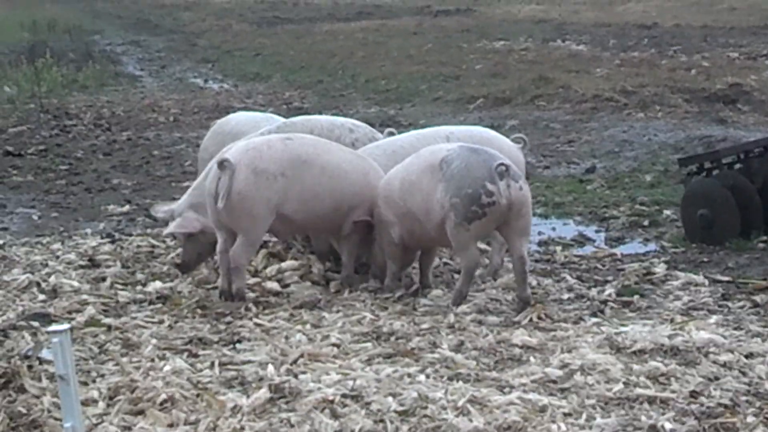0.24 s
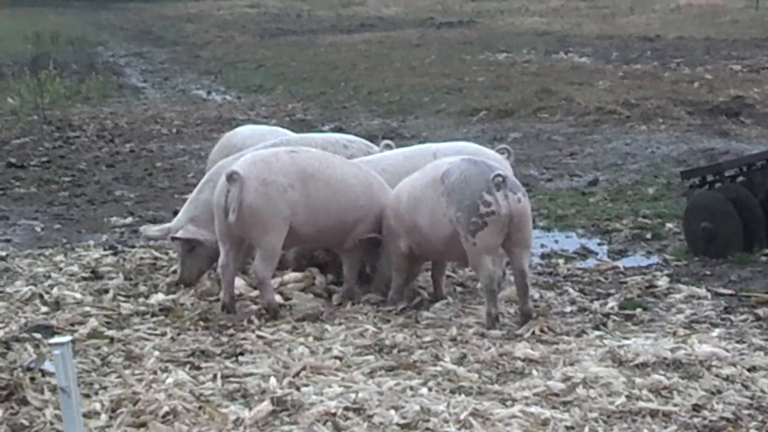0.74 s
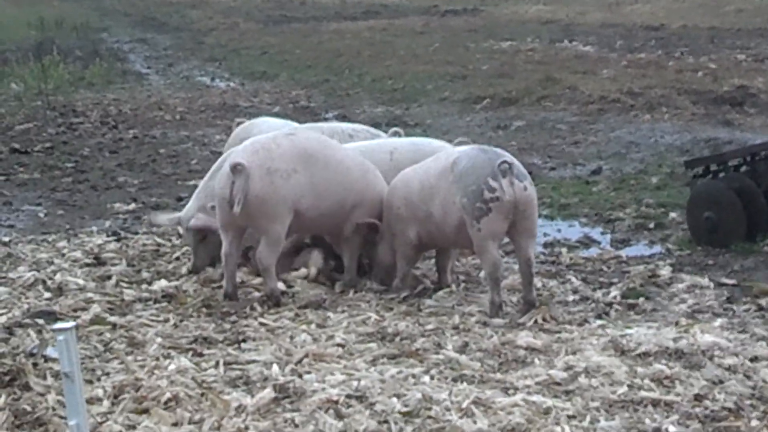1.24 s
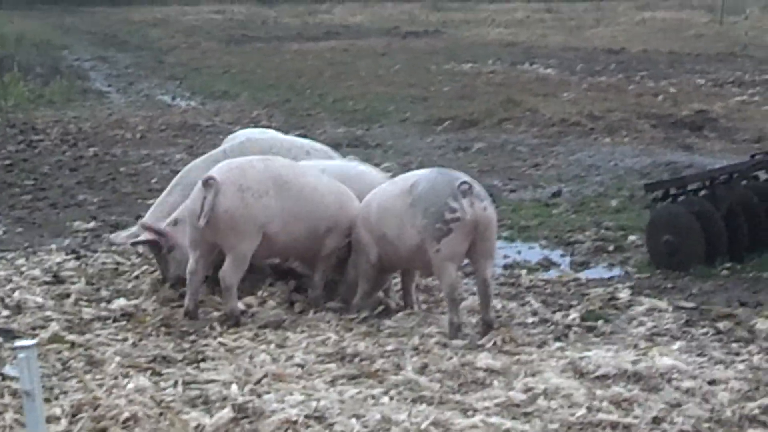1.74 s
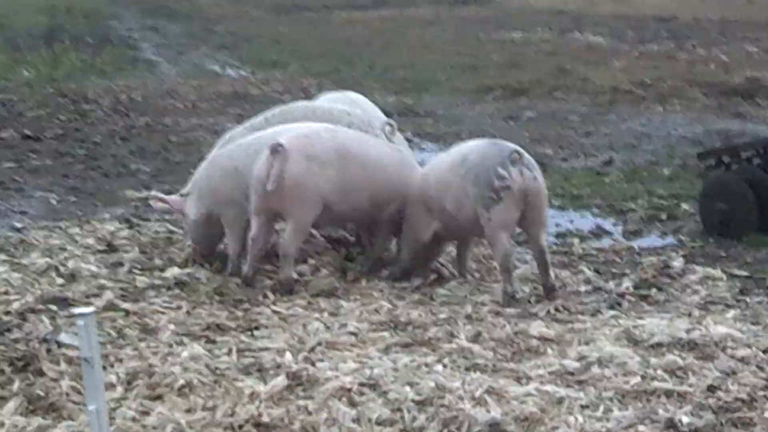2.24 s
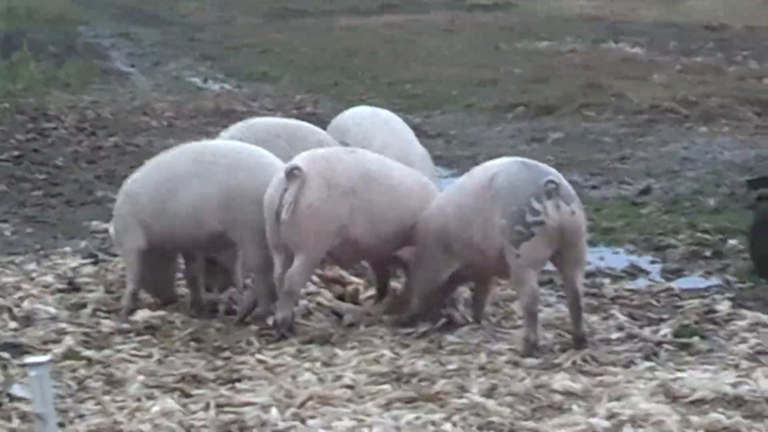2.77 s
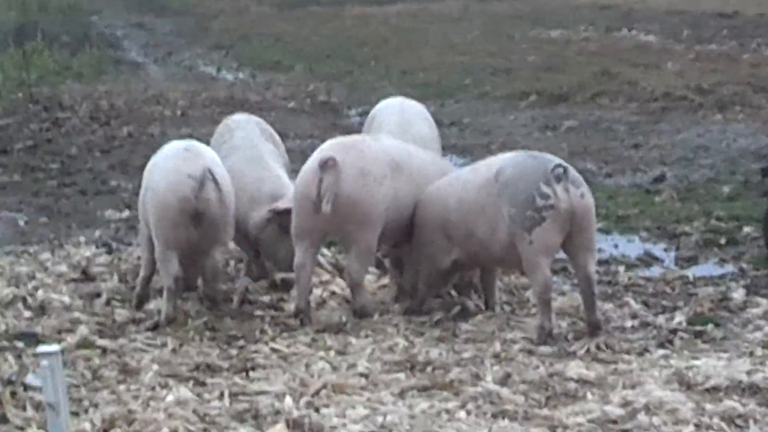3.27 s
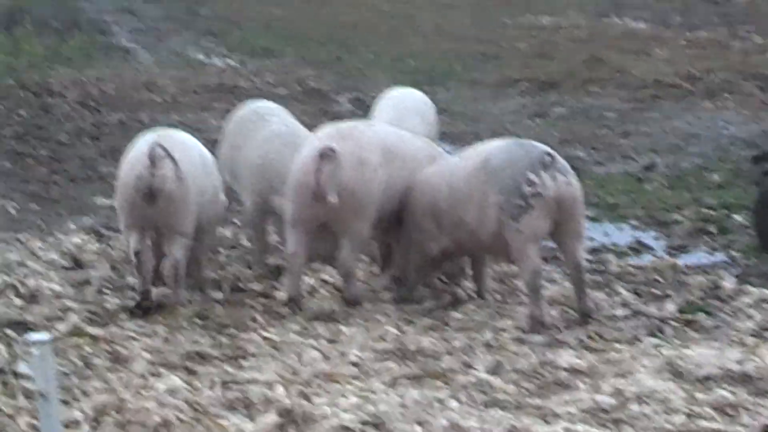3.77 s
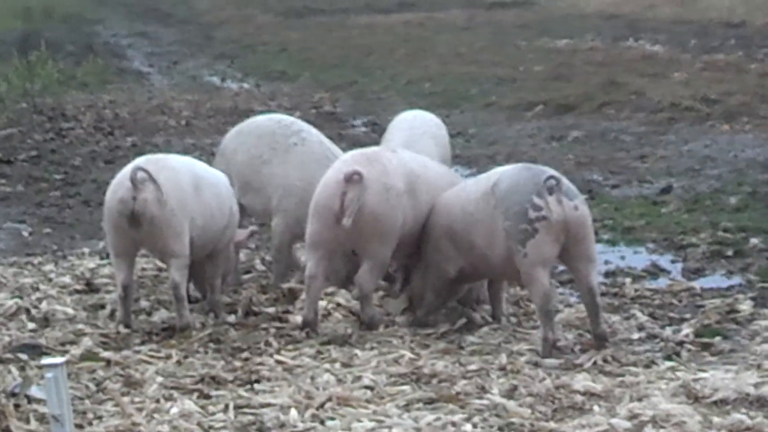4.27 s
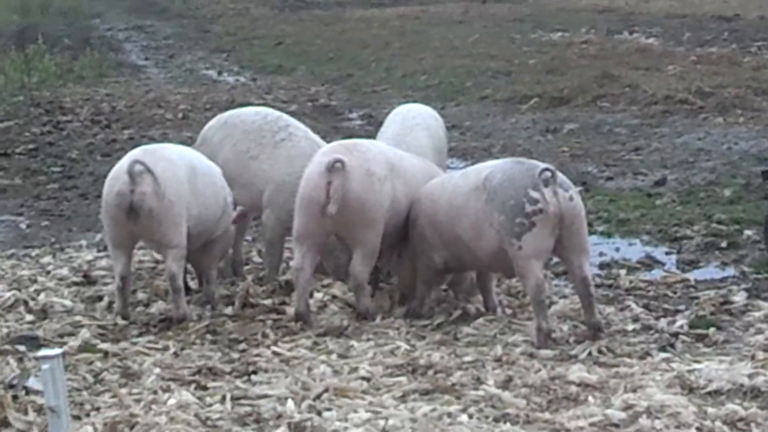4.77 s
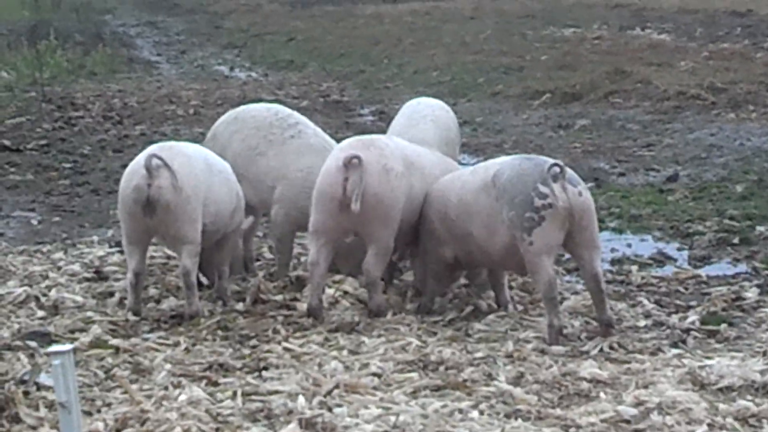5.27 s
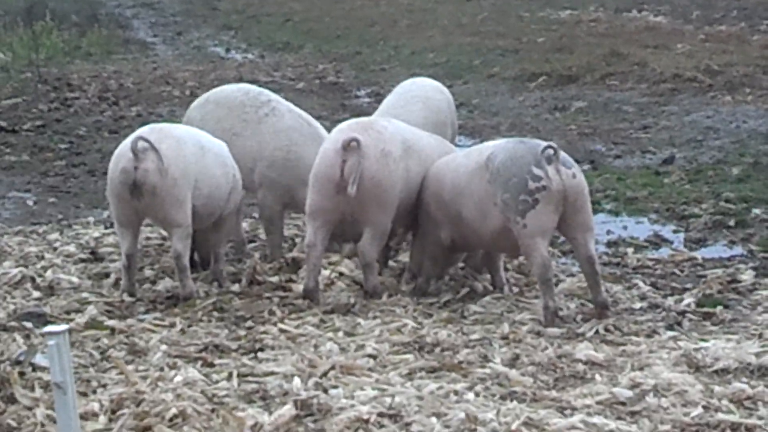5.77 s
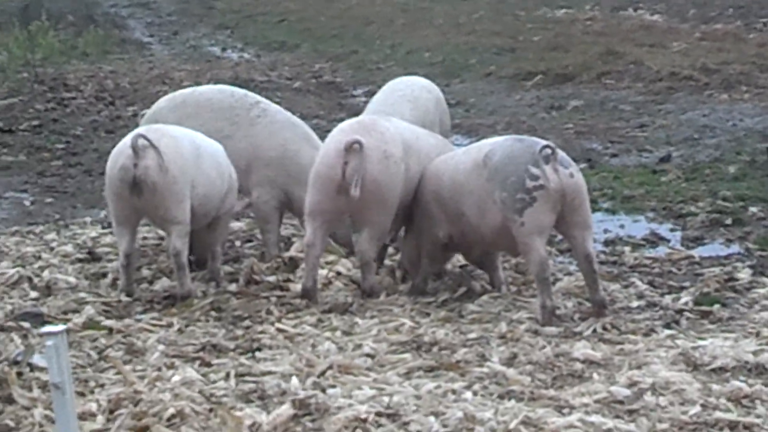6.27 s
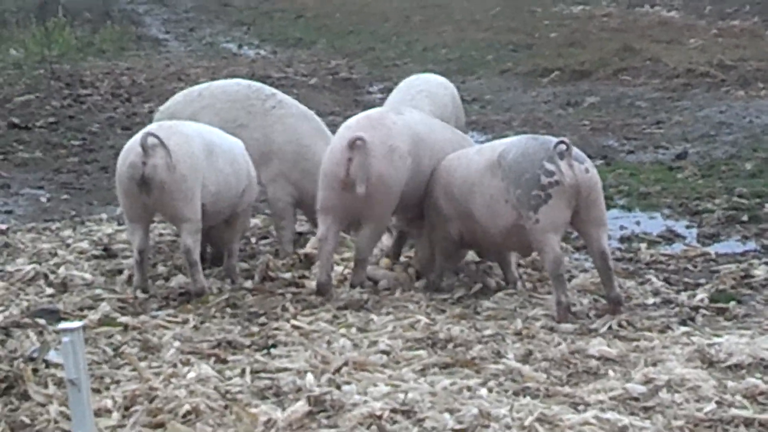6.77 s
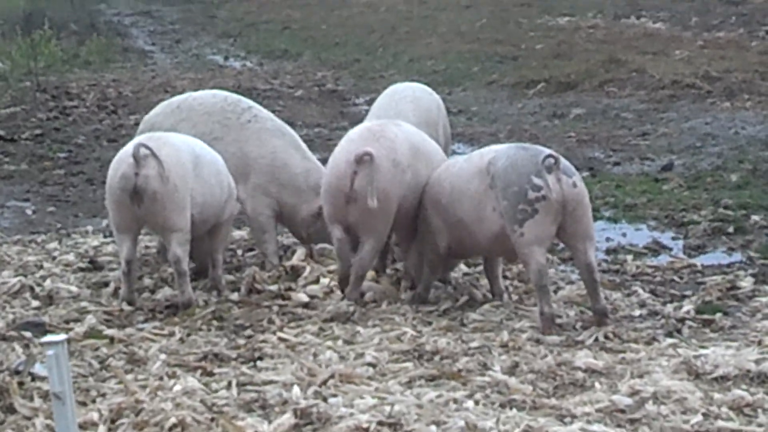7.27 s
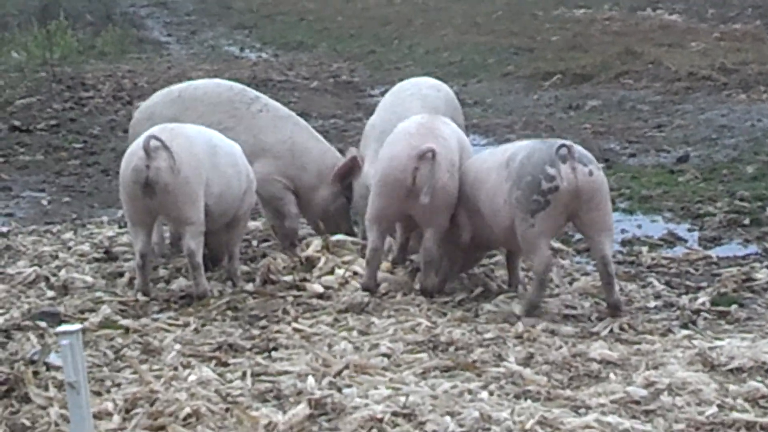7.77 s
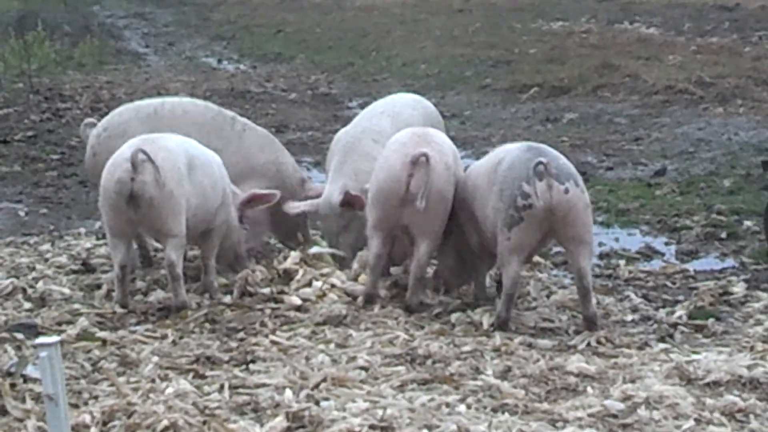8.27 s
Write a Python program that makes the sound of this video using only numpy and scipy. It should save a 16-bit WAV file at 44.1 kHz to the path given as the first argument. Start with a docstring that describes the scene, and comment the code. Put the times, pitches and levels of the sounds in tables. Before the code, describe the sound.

Steady rushing air with lumpy low rumble and thin hiss fills an open field. Dry husks rustle at once, with tiny clicks at the start and soft knocks at 0.3 and 0.6 s. A hard, hollow crunch breaks out at 1.05-1.15 s, another knock at 1.5. Piercing brittle snaps at 2.15-2.25 s push everything down; the rush then slowly swells back. Hollow, slightly ringing knocks come at 3.05-3.3 and 4.6 s, with small ticks between. Rustling thickens around 5.5-6.2 s, with a dull knock at 6.1. Low thuds and crunches cluster at 6.8-7.2, then a hard knock at 7.46 and a deep thump at 7.8. A distant bird's thin falling whistles recur from 1.6 to 4 s, clearest near 5.6, then at 6.4 and faintly around 8. Husks stir to the end at 8.5 s. The stereo is wide and out of phase.

```python
"""Pigs root in dry corn stalks in an open field: hollow knocks (resonant modes struck by bursts of force)
and sharp snaps (very short bursts through bright resonances). Snouts shove through husks (shaped noise and
crackle) over a steady rush of air (shaped noise); a far bird whistles (falling sines with echoes).
The gain control ducks at each loud blow and creeps back, so everything sinks and swells again.
The small stereo microphone hears mostly through one port, so the sound is wide and out of phase."""
import sys
import numpy as np
from scipy import signal
from scipy.fft import rfft, irfft, next_fast_len
from scipy.io import wavfile
from scipy.ndimage import uniform_filter1d

SR = 44100
rng = np.random.default_rng(int(sys.argv[2]) if len(sys.argv) > 2 else 0)


def to_wav(sig):
    """Store sig (one row per channel, or 1-D mono) as 16-bit WAV at the path in sys.argv[1].

    Samples outside -1..1 are clipped; the rate is SR.
    """
    pcm = np.clip(np.atleast_2d(sig), -1, 1) * 32767
    pcm = np.round(pcm).astype(np.int16)
    wavfile.write(sys.argv[1], SR, pcm.T)  # frames by channels


N = 375732

# spectrum of rushing air, also of dull rubbing: (frequency [Hz], relative level per Hz [dB])
AIR_SPECTRUM = [(200, -19), (500, 1.5), (900, 3.5), (1300, -1), (1800, -3), (2300, -1.5), (3000, -14.5),
                (4200, -17.5), (8000, -29)]


def from_db(db):
    """Decibels to amplitude gain."""
    return 10 ** (np.asarray(db) / 20)


def rms_one(x):
    """Scale to rms 1."""
    return x / np.sqrt(np.mean(x ** 2) + 1e-20)


def in_time(rows):
    """A level curve, interpolated to every sample."""
    s, level = np.transpose(rows)
    return np.interp(np.arange(N) / SR, s, level)


def add(out, s, sound):
    """Mix a sound in at a time in seconds."""
    at = int(np.clip(round(s * SR), 0, N - 1))
    out[at:at + len(sound)] += sound[:N - at]


def drift(rate_hz):
    """Slow random wandering of rms 1: noise smoothed by two equal poles."""
    step = 40   # samples between the slow values
    r = np.exp(-2 * np.pi * rate_hz * step / SR)
    noise = rng.standard_normal(N // step + 2002)
    slow = signal.lfilter([1], [1, -2 * r, r * r], noise)[2000:]   # skip the filter's start
    return np.interp(np.arange(N) / step, np.arange(len(slow)), rms_one(slow))


def colour(x, spectrum):
    """Give a steady sound a spectrum; rms 1."""
    hz, db = np.transpose(spectrum)
    size = next_fast_len(N)
    bins = np.maximum(np.arange(size // 2 + 1) * SR / size, 1)
    gain = from_db(np.interp(np.log(bins), np.log(hz), db))
    return rms_one(irfft(rfft(x, size) * gain, size)[:N])


def resonate(x, modes, sign=-1):
    """Parallel resonances with alternating signs, or (sign 1) all starting in step."""
    out = 0
    for k, (hz, width, db) in enumerate(modes):
        r = np.exp(-np.pi * width / SR)
        poles = [1, -2 * r * np.cos(2 * np.pi * hz / SR), r * r]
        mode = (1 - r * r) / 2 * signal.lfilter([1, 0, -1], poles, x)
        out = out + sign ** k * from_db(db) * mode
    return out


def band(x, low_hz, high_hz):
    """Butterworth band-pass."""
    return signal.sosfilt(signal.butter(2, [low_hz, high_hz], "band", fs=SR, output="sos"), x)


def at_level(x, db, first_s):
    """Set the rms level of a sound's first moments."""
    return from_db(db) * x / np.sqrt(np.mean(x[:int(first_s * SR)] ** 2) + 1e-20)


def envelope(x):
    """Running rms over a span short enough to read peaks, keener on the treble."""
    span_s, treble_weight = 0.00069, 2.72
    weighted = x + treble_weight * np.diff(x, prepend=0)
    power = uniform_filter1d(weighted ** 2, int(span_s * SR))
    return np.sqrt(np.maximum(power, 1e-12))


def at_peak(x, db):
    """Set the peak reading of a sound."""
    return from_db(db) * x / envelope(x).max()


def rush(rumble_db, air_db, hiss_db, lumpy_db, flutter_db, flicker_db):
    """Open air all around: lumpy low rumble, rushing air and a thin, flickering hiss, all shaped noise."""
    # spectra of rumble and hiss: (frequency [Hz], relative level per Hz [dB])
    rumble_spectrum = [(12, -36), (25, -10), (50, -15), (80, -5), (120, 1), (200, -5.5), (280, -7),
                       (420, -12.5), (600, -29.5), (1200, -57)]
    hiss_spectrum = [(3000, -48), (6000, 0.5), (8500, -10.5), (11500, -10.5), (13500, 2), (15500, 2.5)]
    layers = [(rumble_db + lumpy_db * drift(5.2), rumble_spectrum),
              (air_db + flutter_db * drift(22.0), AIR_SPECTRUM),
              (hiss_db + flicker_db * drift(23), hiss_spectrum)]
    return sum(from_db(db) * colour(rng.standard_normal(N), spectrum) for db, spectrum in layers)


def bird(waver_hz, echo_db, echo_s):
    """A far bird repeats a thin falling whistle, a wavering sine smeared by scattered echoes."""
    # falling whistles:
    # (time [s], length [s], start pitch [Hz], fall [Hz], peak level before flutter and echoes [dB])
    calls = [(1.57, 0.19, 3300, 90.3, -44), (1.984, .2, 3360, 110, -39.5), (2.553, .22, 3430, 260, -39),
             (3.17, .24, 3320, 125, -37), (3.88, .24, 3375, 240, -39.5), (5.563, 0.28, 3360, 150, -34.5),
             (6.42, 0.24, 3310, 80, -42), (7.724, .22, 3690, 160, -45.5), (7.848, 0.12, 3620, 70, -46.5),
             (8.038, 0.19, 3654, 150, -45.5), (8.142, .19, 3420, 220, -46)]
    out, waver = np.zeros(N), drift(132.8)
    flutter = from_db(1.8 * drift(25))   # moving air breaks up the far calls
    for s, length_s, start_hz, fall_hz, db in calls:
        u = np.linspace(0, 1, int(length_s * SR))
        hz = start_hz - fall_hz * u + waver_hz * np.roll(waver, -int(s * SR))[:len(u)]
        swell = np.interp(u, [0, .15, .55, 1], [0, 1, .7, .1])
        add(out, s, from_db(db) * swell * np.sin(2 * np.pi * np.cumsum(hz) / SR))
    out = out * flutter
    t = np.arange(SR // 2) / SR
    echoes = rng.standard_normal(len(t)) * np.exp(-t / echo_s)
    echoes = echoes / np.sqrt(np.sum(echoes ** 2))
    return out + from_db(echo_db) * signal.fftconvolve(out, echoes)[:N]


def crackle(per_s, spread_db, clump_db):
    """Tiny fibre breaks of uneven size that come in clumps; rms 1."""
    born = rng.random(N) < per_s * from_db(clump_db * drift(14)) / SR
    sizes = from_db(spread_db * np.minimum(rng.exponential(1, N), 4))
    return rms_one(born * sizes * rng.choice([-1, 1], N))


def shoving():
    """Strength of the rustle and of the rubbing: each shove swells and fades in one smooth arch."""
    # a snout or foot shoves through the husks:
    # (time at the strongest [s], length [s], rustle [dB], dull rubbing relative to the rustle [dB])
    shoves = [(0.016, .17, -30, -13), (0.218, 0.23, -39, 0), (0.823, 0.35, -36, -1),
              (1.01, 0.23, -38.5, -4), (1.844, 0.3, -36, 0.5), (2.11, 0.33, -37, -11),
              (2.916, 0.13, -36, -7.5), (4.165, 0.041, -42, 7.5), (4.457, 0.044, -40.5, 2.5),
              (4.61, .045, -39.5, -2), (5.494, 0.27, -36.5, -4.5), (5.662, .23, -32, -4),
              (5.957, 0.24, -32.5, -2), (6.105, 0.15, -36.5, 0), (6.188, 0.2, -36, -5.5),
              (7.162, 0.24, -40, 6.5), (7.982, 0.26, -41, -4), (8.478, 0.42, -38.5, -1.5)]
    t = np.arange(N) / SR
    strength = np.zeros((2, N))
    for s, length_s, db, rub_db in shoves:
        arch = np.cos(np.pi * np.clip((t - s) / length_s, -.5, .5))
        strength += from_db([[db], [db + rub_db]]) * arch
    return strength


def husks(push, rubbing, grain_share, tick_db):
    """Snouts and feet push through dry husks: smooth rubbing, fine crackle and now and then a small tick."""
    # spectrum of rustling husks: (frequency [Hz], relative level per Hz [dB])
    rustle_spectrum = [(1000, -4), (2200, 5), (3000, 4), (3450, 2.5), (3850, 2.5), (4400, 0), (5500, -8),
                       (7500, -15), (10000, -22.5), (16000, -31)]
    steady_rustle = from_db(-44.5)   # husks stirring all the time
    grains = crackle(per_s=1500, spread_db=5.5, clump_db=5.5)
    mixed = np.sqrt(grain_share) * grains + np.sqrt(1 - grain_share) * rng.standard_normal(N)
    rustle = colour(mixed, rustle_spectrum)
    t = np.arange(SR // 50) / SR
    tear = rng.standard_normal(len(t)) * np.exp(-t / 0.0062)   # a fibre tears over a few milliseconds
    breaks = crackle(per_s=30, spread_db=-6.0, clump_db=-0.5)
    ticks = rms_one(band(signal.fftconvolve(breaks, tear)[:N], 1500, 5900))
    rub = rubbing * colour(rng.standard_normal(N), AIR_SPECTRUM)
    return np.hypot(steady_rustle, push) * (rustle + from_db(tick_db) * ticks) + rub


def contact(t, rattle_s, hardness, tail_db, tail_s):
    """A hard blow is mostly one push; a soft one builds up and rattles in slips. Loose litter settles after."""
    grip = from_db(1.5 * rng.standard_normal(len(t) // 64 + 1)).repeat(64)[:len(t)]   # changes every 1.5 ms
    build = 1 - np.exp(-t / (0.14 * rattle_s * (1 - hardness) + 1 / SR))
    decay = np.exp(-t / rattle_s) + from_db(tail_db) * np.exp(-t / tail_s)
    rattle = rng.standard_normal(len(t)) * grip * build * decay
    rattle = rattle / np.sqrt(np.sum(rattle ** 2))
    push = 1.32 * hardness * (t == 0)
    return np.sqrt(1 - hardness ** 4) * rattle + push


def snaps():
    """Brittle breaks: a very short burst through broad, bright resonances; a thicker stalk sounds lower."""
    # dry snaps and chewing ticks, peaks ahead of the gain control:
    # (time [s], peak reading [dB], top relative to the crack [dB], decay [s], pitch [ratio])
    breaks = [(0.0275, -14, -14, .0005, 1), (0.0402, -17, -14, .0005, 1), (0.531, -21, -7.5, 0.0056, 0.28),
              (0.757, -27, -4, 0.00091, 1), (1.016, -19, 3, 0.00024, 2.1), (1.107, -17, -18, .0015, .9),
              (1.147, -15.5, -15, 0.0038, 1.16), (1.354, -23, -18, .001, .6),
              (2.159, -3.5, 3, 0.00018, 0.84), (2.2184, 6, 6.5, 0.00045, 1.16),
              (2.2525, 11.5, 12.5, 0.00018, 0.52), (2.533, -22, -6, .0008, 1.1),
              (2.589, -27, -15, 0.001, 0.26), (2.6197, -15, -8, 0.0028, 0.36),
              (2.72, -22, -14, .0008, 0.88), (2.749, -28, -2, .0008, 1.1), (3.02, -25, -12, 0.00087, .85),
              (3.186, -12, -18, 0.0027, 0.64), (3.424, -26, -12, 0.002, 0.92), (3.61, -23, -1, .0015, 1),
              (3.621, -26, -4, .001, 1.05), (3.73, -31, -12, .001, 0.87), (3.847, -23.5, 3, .0024, 1.6),
              (4.084, -21, 7, .0015, 1.5), (4.438, -19.5, 4.5, .002, 1.7), (4.7, -30, -6, .0015, 0.4),
              (5.081, -24, 7, 0.00074, 1.6), (5.312, -17, -17.5, 0.0012, 1.12),
              (5.374, -23, -16, 0.0042, 0.57), (5.468, -18, -19, 0.00055, 0.48),
              (5.605, -23, -12, 0.0023, 1.1), (6.769, -20.5, -12, 0.0014, 0.26),
              (7.231, -22, -6, 0.0018, 0.99)]
    # resonances of a stalk and of its bright top: (frequency [Hz], width [Hz], level [dB])
    stalk_modes = [(700, 1800, -6), (3870, 1100, 5), (5060, 2800, -2.5)]
    top_modes = [(13100, 1700, 1)]
    out, t = np.zeros(N), np.arange(SR // 20) / SR
    for s, peak_db, top_db, decay_s, pitch in breaks:
        burst = contact(t, decay_s, hardness=0.16, tail_db=-33, tail_s=0.0039)
        stalk = [(hz * pitch, width * pitch, db) for hz, width, db in stalk_modes]
        crack = at_level(band(resonate(burst, stalk), 250, 6100), 0, first_s=0.013)
        top = at_level(band(resonate(burst, top_modes), 8100, 17700), top_db, first_s=0.0019)
        add(out, s, at_peak(crack + top, peak_db))
    return out


def struck(modes, pitch=1):
    """Each blow lands on another spot, so the modes differ a little in strength; pitch scales them all."""
    spot_db = 1.3 * rng.standard_normal(len(modes))
    return [(hz * pitch, width, db + spot) for (hz, width, db), spot in zip(modes, spot_db)]


def knocks(scuff_db, slap_db):
    """Blows ring a hollow body's low, middle and high modes, some fixed longer tones and a faint scuff."""
    # hollow knocks and crunches, peaks ahead of the gain control, parts relative to the body:
    # (time [s], peak reading [dB], thud [dB], crack [dB], ring [dB], hollow tone [dB],
    #  rattle time of the contact [s], hardness [0-1], pitch [ratio])
    blows = [(0.26, -19.5, -1, -27, -32, -8, 0.0082, .2, 0.98),
             (0.58, -24, 8.5, -2, -25, -20, 0.0071, 0.62, 0.97),
             (1.045, 3, 3, 1.5, -17, -18, .006, .52, 1.05),
             (1.0494, 3.5, 4.5, -3, -22, -12, 0.02, 0.29, 1.3),
             (1.071, -2, -7, -0.5, -16, -11, 0.02, 0.3, 0.97),
             (1.105, -9.5, 5, -2, -14, -3, .008, .26, 1.07),
             (1.147, -9.5, 3.5, 1.5, -4, -4, 0.014, 0.16, 1.09),
             (1.5168, 1.5, -1, 1, -16, -11, .008, .38, 0.96),
             (1.524, 1.5, -3, -3, -20, -4, 0.0035, 0.41, 1.3),
             (1.705, -22.5, -17.5, 0, -14, -20.5, 0.015, 0.23, 1.28),
             (1.772, -24.5, -15, -10, -18, -20, .004, .4, 1.3),
             (1.845, -16.5, -7, 0, -10, -20, .0058, .35, 0.92),
             (3.066, -5, -5, -14, -17, -2, 0.03, 0.14, 1.05), (3.12, -3, -4, -4, -5.5, 6, .018, 0.27, 0.99),
             (3.16, -17, 5, -7, -10, -2, .015, .1, 1.1), (3.185, -11, -5, 1, -2.5, -2, .007, 0.28, 0.95),
             (3.275, -16.5, 3, -12, -18, 0, 0.019, .05, 0.88), (4.428, -25.5, -5, 4, 6, -10, .003, .5, 0.9),
             (4.577, -21.5, 4, 1, 5, -2.5, .009, .35, 1), (4.6175, -3.5, -2, -2, -20, 6, .013, 0.14, .96),
             (4.65, -13, 9, 4, -20, -10, .0058, 0.32, 1), (4.664, -16, 5, -17, -22, -2, .016, .12, 1),
             (6.124, -4.5, -3, -32, -37, -12, .011, 0.56, 0.86),
             (6.834, -9, 10, -4.5, -26, -13, 0.017, 0.48, .95),
             (6.879, -6.5, 12.5, -4.5, -19, -1, 0.014, 0.16, 1.02),
             (7.031, -14.5, -2, -9.5, -30, 3, 0.0092, 0.18, 1.14),
             (7.043, -15.5, 1, -5.5, -22, 1, 0.0057, 0.27, 1.1), (7.075, -16, 2, -13, -18, -1, .01, .3, 1),
             (7.115, -16, 2, -3, -21, -3, .046, 0.21, 1.04),
             (7.161, -6.5, -1.5, -12, -21, 3, .024, .12, 1.05),
             (7.186, -3, -4, -6, -27, 2, .012, .25, 1.15),
             (7.459, -4.5, 1.5, -28, -35, -20, .0052, 0.89, 0.83),
             (7.468, -11, 2, -18, -35, -15, .0057, 0.67, 1.02),
             (7.807, -13, 29, -14, -20, -15, 0.0063, 0.58, 1.03)]
    # what a knock rings with, each: (frequency [Hz], width [Hz], level [dB])
    thud_modes = [(96.5, 38.5, -1.5), (136.3, 40, 1), (185, 22.3, -3.5)]
    body_modes = [(227, 56, -0.5), (282.6, 33, 4.5), (377, 45, -7), (462, 30, -0.5), (567, 21, -21.5)]
    crack_modes = [(633, 210, -2), (1140, 260, -2.5), (1470, 276, 0.5), (1734, 540, -3.5),
                   (2320, 290, -1.5), (3170, 490, -9.5), (4660, 300, -19.5)]
    ring_modes = [(752, 21, -0.5), (1093, 25, 3), (1638, 43, -4)]
    hollow_modes = [(288, 13, 1.5), (475.7, 23, -9)]
    out, t = np.zeros(N), np.arange(SR // 3) / SR
    for s, peak_db, thud_db, crack_db, ring_db, hollow_db, rattle_s, hardness, pitch in blows:
        low_force = contact(t, rattle_s, hardness, tail_db=-21, tail_s=0.061)
        thud = band(resonate(low_force, struck(thud_modes, pitch)), 86, 300)
        body_force = contact(t, rattle_s, hardness, tail_db=-14, tail_s=0.048)
        body = band(resonate(body_force, struck(body_modes, pitch), sign=1.0), 192, 580)
        body = band(body, 93, 524)   # the body carries almost nothing above its modes
        force = contact(t, rattle_s, hardness, tail_db=-10, tail_s=0.029)
        # a hard blow is heard directly, as one broad pulse
        slap = from_db(slap_db) * hardness ** 2 * band(force, 320, 1490)
        crack = band(resonate(force, struck(crack_modes, pitch)) + slap, 290, 6900)
        ring = resonate(force, struck(ring_modes))
        hollow = sum(at_level(resonate(force, [(hz, width, 0)]), db, first_s=0.15)
                     for hz, width, db in hollow_modes)
        scuff = band(force, 4300, 13300)
        parts = [(thud, thud_db), (body, 0), (crack, crack_db), (ring, ring_db),
                 (hollow, hollow_db), (scuff, crack_db + scuff_db)]
        knock = sum(at_level(x, db, first_s=0.15) for x, db in parts)
        add(out, s, at_peak(knock, peak_db))
    return out


def gain_control(x):
    """A peak over the ceiling turns the gain down quickly; it then creeps back at a steady rate."""
    ceiling_db, start_cut_db = -12.5, 9   # the gain is already turned down at the start
    attack_s, recover_db_per_s = 0.0019, 8.5
    over_db = np.maximum(20 * np.log10(envelope(x[0])) - ceiling_db, 0)   # only the first port steers it
    recovered = recover_db_per_s * np.arange(N) / SR
    held_db = np.maximum.accumulate(np.maximum(over_db + recovered, start_cut_db))
    cut_db = held_db - recovered
    r = np.exp(-1 / (attack_s * SR))
    smooth_db, _ = signal.lfilter([1 - r], [1, -r], cut_db, zi=[r * cut_db[0]])
    return x * from_db(-smooth_db)


def scene():
    """Everything in the field reaches the first port; the second gives only a weak hiss."""
    # levels of the low rumble and of the thin treble hiss: (time [s], level [dB])
    rumble_level = [(0, -32), (0.95, -30), (1.5, -31), (2.5, -32.5), (4.2, -32.5), (5.3, -32), (6.1, -31),
                    (6.5, -33), (7.5, -30.5), (8.52, -30.5)]
    hiss_level = [(0, -49), (1, -46.5), (1.6, -45.5), (2.4, -43.5), (3.6, -45.5), (5.2, -49), (6, -40),
                  (6.4, -43.5), (7.5, -47), (8.52, -45)]
    # hiss of the weak port: (frequency [Hz], relative level per Hz [dB])
    weak_spectrum = [(400, -31), (2000, -6), (4000, -31), (7000, -9), (10000, 19), (15500, 11.5)]
    rumble_db, hiss_db = in_time(rumble_level), in_time(hiss_level)
    field = rush(rumble_db, -39.5, hiss_db, lumpy_db=2.5, flutter_db=0.6, flicker_db=3.0)
    whistles = bird(waver_hz=32, echo_db=-4, echo_s=.035)
    push, rubbing = shoving()
    litter = husks(push, rubbing, grain_share=0.34, tick_db=-13) + snaps()
    strong = field + whistles + litter + knocks(scuff_db=-34.5, slap_db=18)
    weak_db = hiss_db - 11   # follows the slow level of the treble hiss
    weak = from_db(weak_db) * colour(rng.standard_normal(N), weak_spectrum)
    return np.array([strong, weak])


def record(dry):
    """After the gain control, stereo widening takes from each side a late copy of the other; the top is cut."""
    lag, cutoff_hz = 16, 15800   # lag in samples
    held = gain_control(dry)
    late = np.pad(held[::-1], [(0, 0), (lag, 0)])[:, :N]   # sides swapped
    wide = held - from_db(.35) * late
    return signal.sosfilt(signal.ellip(10, .2, 80, cutoff_hz, fs=SR, output="sos"), wide)


dry = scene()
out = record(dry)
to_wav(out)
```